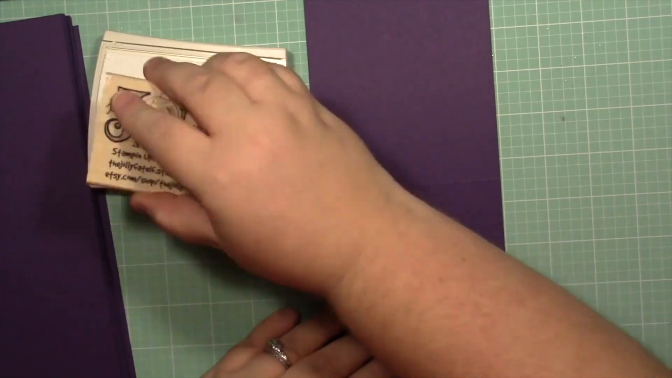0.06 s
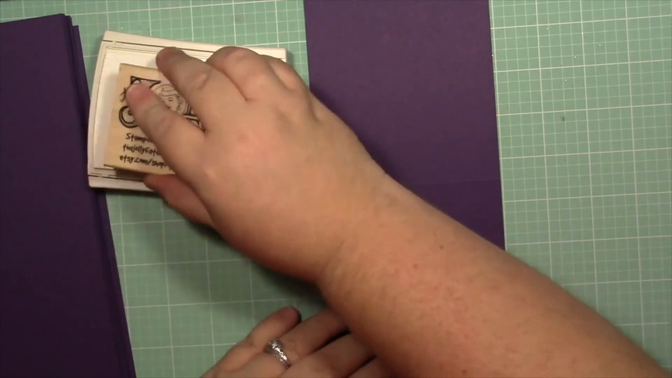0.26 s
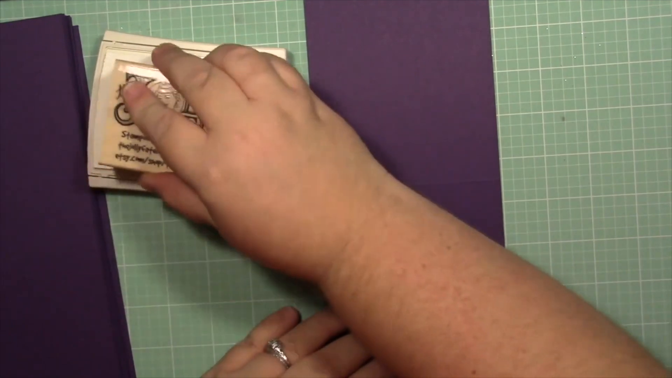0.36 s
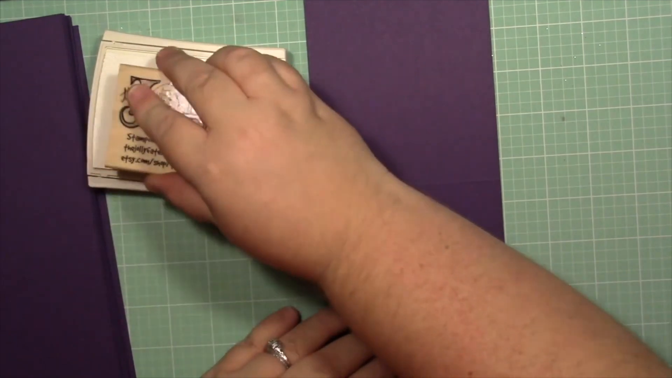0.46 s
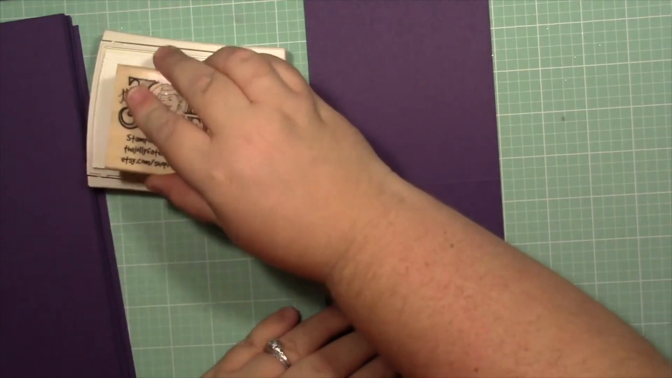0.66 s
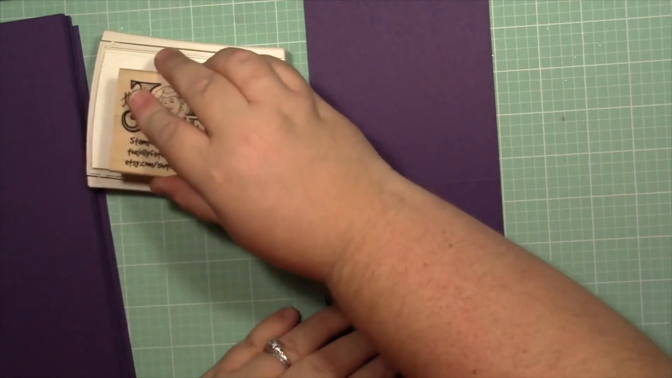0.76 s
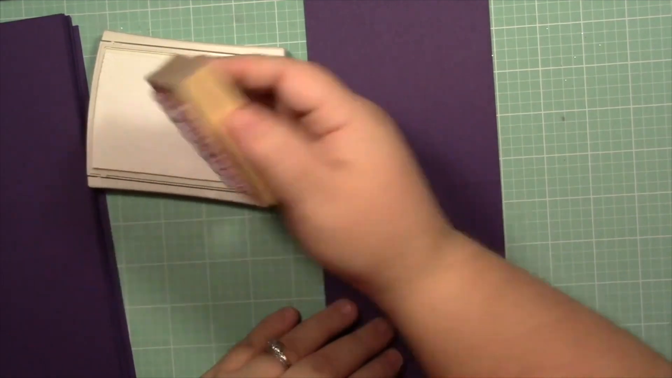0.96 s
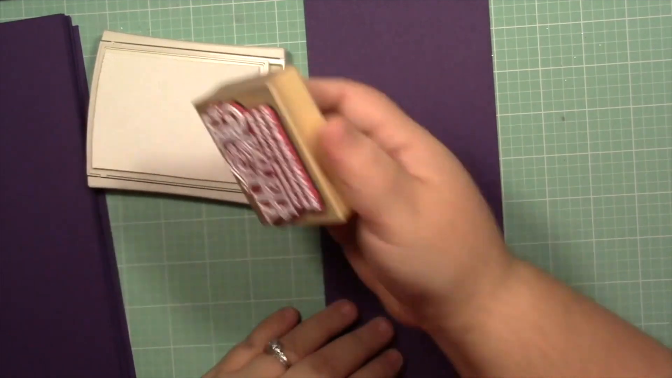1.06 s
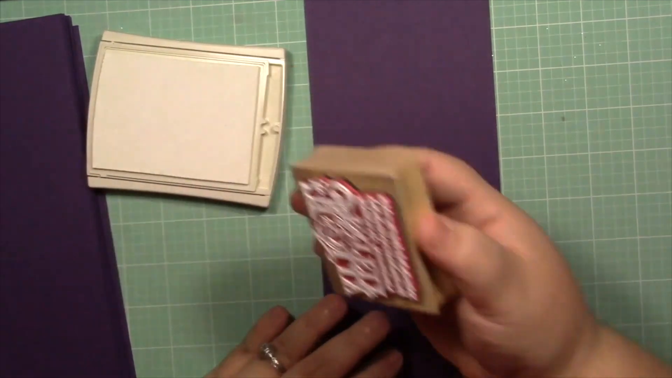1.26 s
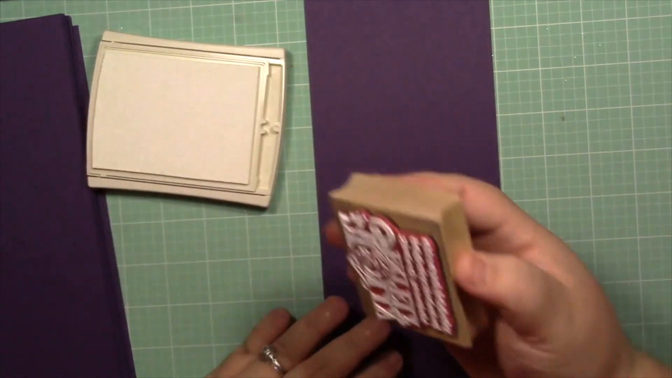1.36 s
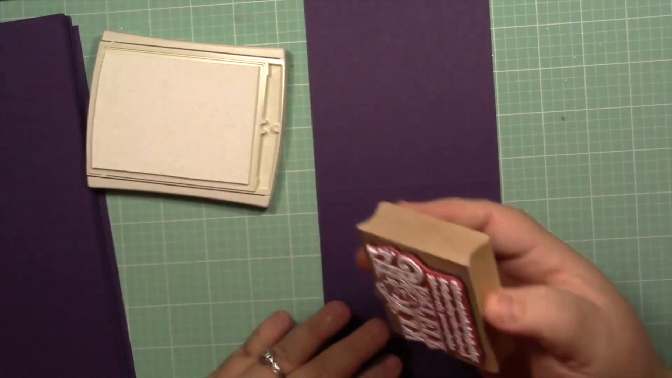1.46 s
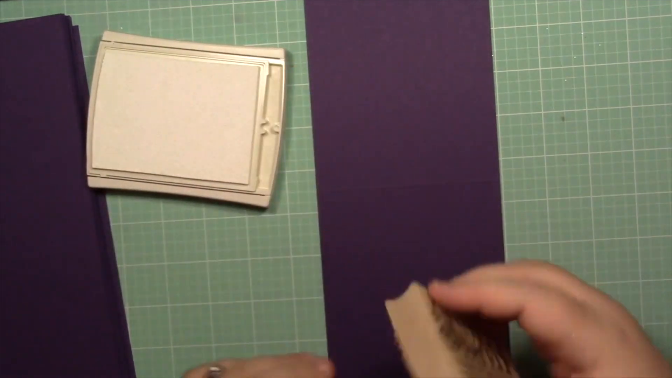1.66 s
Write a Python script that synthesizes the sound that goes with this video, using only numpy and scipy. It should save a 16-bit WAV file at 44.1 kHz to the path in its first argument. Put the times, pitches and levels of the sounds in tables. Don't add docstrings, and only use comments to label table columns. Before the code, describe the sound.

Wooden stamp knocks four times on a hollow plastic ink pad, the second knock by far loudest

```python
import sys
import numpy as np
from scipy import signal
from scipy.fft import rfft, irfft
from scipy.io import wavfile
from scipy.ndimage import uniform_filter1d, map_coordinates

SR = 44100
rng = np.random.default_rng(int(sys.argv[2]) if len(sys.argv) > 2 else 0)


def makeup_ratio(level_db):
    decades = np.asarray(level_db, float) / 20
    return 10 ** decades


def bounce(signal):
    frames = np.transpose(np.atleast_2d(signal))
    limited = np.clip(frames, -1, 1)
    pcm = np.round(limited * 32767).astype(np.int16)
    wavfile.write(sys.argv[1], SR, pcm)


N = 74970

# frequency in Hz, strength in dB per Hz.
HISS = [(25, -10), (60, -11.5), (134, -0.5), (330, -2.5), (520, -7), (1700, -14), (11000, -31),
        (16000, -45.5)]
# frequency in Hz, strength in dB per Hz.
RUSTLE = [(150, -21), (400, 0.5), (1200, -6.5), (3000, -7), (7000, -16), (15000, -25.5)]
# time in seconds, level in dB.
ARM_MOVEMENT = [(.85, -68.5), (1.0, -61.5), (1.1, -58), (1.249, -58), (1.4, -59), (1.55, -57), (1.7, -56.5)]
HISS_DB, FLOOR_SIDE_DB, ARM_PAN_DB = -58.5, 10, -0.6

# frequency in Hz, left-right difference against the middle in dB.
APART = [(30, 4), (100, -20), (600, -14), (2500, -20), (5000, -46.5), (9000, -39)]
# frequency in Hz, time to fall by 60 dB in seconds.
ROOM_FADE = [(100, 0.48), (500, 0.35), (2000, 0.43), (6000, 0.38), (14000, 0.57)]
# frequency in Hz, level in dB.
ROOM_TONE = [(60, -11), (300, 0), (600, 0), (1200, -7.5), (2000, -17.5), (3500, -15), (7000, -26),
             (15000, -49)]
ROOM_DB, ROOM_GAP_S, ROOM_RISE_S, ROOM_FOLLOWS = -5.5, 0.004, 0.002, 0.78
ROOM_RING_DB, SIDE_DB = -11, -10
WALL_S, WALL_DB = 0.0135, -18.5

TICK_S, TICK_RATE = 0.0035, 15
TICK_DB, TICK_HZ, TICK_T60, TICK_RISE_S, TICK_SCATTER_DB = -41.5, 1970, 0.011, 0.0008, 1.2

# frequency in Hz, strength in dB per Hz.
THUD = [(150, -28), (300, -32), (440, -1), (500, 5.5), (570, -4.5), (870, -3), (1600, -8), (2300, -36)]
THUD_S, THUD_DB, THUD_GRAIN_DB = 1.29, -49, 1
THUD_RISE_S, THUD_HOLD_S, THUD_T60 = 0.004, 0.025, 0.3
SNAP_S, SNAP_DB = 1.5305, -37

# time in seconds, level in dB, length in seconds, brightest Hz.
PEELS = [
    (.328, -53, .003, 6940),
    (0.503, -60, .003, 9000),
    (0.631, -58, .003, 9500),
    (.6402, -45, .004, 6840),
    (0.7947, -43, 0.0039, 8300),
    (1.078, -64, .008, 11000),
    (1.127, -60, 0.0045, 9900),
    (1.163, -65, .002, 12000),
]
# share of the brightest Hz, strength in dB per Hz.
INK = [(.15, -49), (.5, 1), (1.02, 3.5), (1.6, -10.5), (2.5, -24)]

# time in seconds, level in dB.
DROPS = [
    (0.328, -40),
    (0.8019, -23),
]
# frequency in Hz, level in dB, time to fall by 60 dB in seconds.
RIM = [(205, -6, 0.037), (417, -1, 0.017), (713, -2.5, 0.022), (1180, -3, 0.013), (1706, 0.5, 0.017),
       (2470, -12, .012), (3710, -13, 0.013)]
# frequency in Hz, strength in dB per Hz.
RIM_CRACK = [(100, -20), (300, -7), (1200, 5), (2500, -7.5), (4500, -13), (7000, -39)]
RIM_ROOM_DB = -2

# time in seconds, level in dB, case pitch in Hz, block level in dB.
TAPS = [
    (0.233, -18.5, 592, 2.5),
    (0.4177, -6, 594, -2.5),
    (0.5647, -20, 579, -0.5),
    (0.7082, -16, 552, -3),
]
# frequency in Hz, level in dB, time to fall by 60 dB in seconds.
SPOTS = [
    [(950, -13.5, 0.065), (1180, -5, 0.012), (1656, -12.5, .013)],
    [(753, -14, 0.044), (1175, -11, 0.016), (1560, -13, 0.011)],
    [(958, -5, 0.066), (1240, -8, 0.0075), (1774, -11.5, 0.018)],
    [(150, -14, .04), (1092, -1, 0.01), (1750, -12, 0.014)],
]
# frequency in Hz, level in dB, time to fall by 60 dB in seconds.
LID = [(196, -12, 0.027), (289, -8.5, 0.019), (419, -11, 0.034)]
# frequency in Hz, level in dB, time to fall by 60 dB in seconds.
BLOCK = [(2510, -13.5, 0.02), (2802, -6, 0.011), (3330, -20, 0.03), (3894, -4.5, 0.011), (4220, -12, 0.012),
         (5790, -11.5, 0.011), (6727, -14, .014), (9500, -24, 0.012)]
# frequency in Hz, level in dB, time to fall by 60 dB in seconds.
TABLE = [(88, -25.5, 0.31), (127.4, -24, 0.15), (197, -29, 0.28), (282.7, -32, 0.41), (350.4, -28.5, 0.14),
         (547, -26, 0.17)]
# frequency in Hz, strength in dB per Hz.
CRACK = [(100, -25), (300, 17), (1000, -0.5), (2000, 6.5), (4000, 8), (8000, -2.5), (12000, -5),
         (16000, -29)]
CASE_PEAK_S, CASE_LEAD_S, CASE_WIDTH_S = 0.0062, 0.0042, 0.002
LEAD_IN_S, LEAD_IN_DB = 0.004, -24.5
SPOT_RISE_S, SPOT_T60_MAX = 0.0016, 0.045
LID_DB, LID_RISE_S, LID_LEAD_S = -3.5, 0.0007, 0.00062
BLOCK_RISE_S, CRACK_DB, CRACK_T60 = 0.0005, -14.5, 0.02
TABLE_RISE_S, TABLE_FOLLOWS = 0.0056, 0.56
SCATTER_DB, PAN_DB = 1.5, -0.45

MIC_LOW_HZ, TOP_HZ = 49.4, 16300
CEILING, KNEE = 0.8, 3


def unit(x):
    return x / np.sqrt(np.mean(x ** 2) + 1e-20)


def along(points, hz):
    f, v = np.transpose(points)
    return np.interp(np.log(hz + 1), np.log(f + 1), v)


def noise(spectrum, size):
    z = rfft(rng.standard_normal(size))
    colour = makeup_ratio(along(spectrum, np.fft.rfftfreq(size, 1 / SR)))
    return unit(irfft(z * colour, size))


def add(track, s, x):
    part = track[..., max(round(s * SR), 0):][..., :x.shape[-1]]
    part += x[..., :part.shape[-1]]


def ring(modes, rise_s, scatter_db, turn):
    t = np.arange(SR // 2) / SR
    luck = rng.standard_normal((len(modes), 2))
    total = np.zeros(len(t))
    for (hz, db, t60), (level_luck, phase_luck) in zip(modes, luck):
        fade = makeup_ratio(db + scatter_db * level_luck - 60 * t / t60)
        total += fade * np.sin(2 * np.pi * hz * t + turn * phase_luck)
    return (1 - np.exp(-(t / rise_s) ** 2)) * total


def sides(x):
    return irfft(rfft(x) * makeup_ratio(along(APART, np.fft.rfftfreq(len(x), 1 / SR))), len(x))


def tail(tone):
    hz, t, z = signal.stft(rng.standard_normal((2, SR // 2)), SR, nperseg=256)
    z = z * makeup_ratio(-60 * t / along(ROOM_FADE, hz)[:, None] + along(tone, hz)[:, None])
    rise = 1 - np.exp(-np.arange(SR // 2 + 94) / SR / ROOM_RISE_S)
    mid, side = signal.istft(z, SR, nperseg=256)[1] * rise
    side = makeup_ratio(SIDE_DB) * sides(side)
    return np.array([mid + side, mid - side]) / np.linalg.norm(mid)


def room(x):
    answer = makeup_ratio(ROOM_RING_DB) * tail([(1000, 0)])
    answer[:, round(WALL_S * SR)] += makeup_ratio(WALL_DB)
    return signal.fftconvolve(x[None], answer, axes=1)


def floor():
    s, db = np.transpose(ARM_MOVEMENT)
    flutter = map_coordinates(rng.standard_normal(60), [np.arange(N) * 30 / SR])
    arm = makeup_ratio(np.interp(np.arange(N) / SR, s, db) + 1.1 * flutter)
    hiss = makeup_ratio(HISS_DB) * noise(HISS, N)
    rustle = arm * noise(RUSTLE, N)
    other = makeup_ratio(HISS_DB) * noise(HISS, N) + arm * noise(RUSTLE, N)
    side = makeup_ratio(FLOOR_SIDE_DB) * sides(other)
    return hiss + rustle * makeup_ratio([[ARM_PAN_DB], [-ARM_PAN_DB]]) + side * [[1], [-1]]


def lens_ticks():
    out = np.zeros(N)
    modes = [(TICK_HZ, 0, TICK_T60), (1.12 * TICK_HZ, -8, TICK_T60)]
    for k in range(26):
        tick = makeup_ratio(TICK_DB) * ring(modes, TICK_RISE_S, TICK_SCATTER_DB, 0.77)
        add(out, TICK_S + k / TICK_RATE, tick)
    return out


def far_thud():
    out, t = np.zeros(N), np.arange(SR // 2) / SR
    grain = THUD_GRAIN_DB * unit(uniform_filter1d(rng.standard_normal(len(t)), size=200))
    fade_db = -60 * np.maximum(t - THUD_HOLD_S, 0) / THUD_T60
    shape = makeup_ratio(THUD_DB + grain + fade_db) * (1 - np.exp(-t / THUD_RISE_S))
    add(out, THUD_S, shape * noise(THUD, len(t)))
    snap = ring([(1490, 4.5, 0.0027), (2550, -6, 0.0037)], 0.00018, 0, 0)
    add(out, SNAP_S, makeup_ratio(SNAP_DB) * snap)
    return out


def peels():
    out, t = np.zeros((2, N)), np.arange(-1024, 1024) / SR
    for s, db, length, hz in PEELS:
        grit = makeup_ratio(4.8 * uniform_filter1d(rng.standard_normal(len(t)), size=9))
        shape = np.exp(-(t / np.where(t < 0, 0.4 * length, length)) ** 2)
        colour = [(share * hz, g) for share, g in INK]
        burst = makeup_ratio(db) * noise(colour, len(t)) * grit * shape
        add(out, s + t[0], burst[None])
        add(out, s + t[0], 0.61 * room(burst))
    return out


def drops():
    out, t = np.zeros((2, N)), np.arange(SR // 2) / SR
    for s, db in DROPS:
        landing = 0.38 * makeup_ratio(-60 * t / 0.015) * noise(RIM_CRACK, len(t))
        clack = makeup_ratio(db) * (ring(RIM, 0.0006, 0.96, 1.22) + landing)
        add(out, s, clack + makeup_ratio(RIM_ROOM_DB) * room(clack[:SR // 8])[:, :len(clack)])
        add(out, s + ROOM_GAP_S, makeup_ratio(db + 9.5) * tail(ROOM_TONE))
    return out


def taps():
    out, t = np.zeros((2, N)), np.arange(SR // 2) / SR
    u = t - CASE_PEAK_S
    swell = np.exp(-(u / CASE_WIDTH_S) ** 2) + makeup_ratio(LEAD_IN_DB) * np.exp(-(u / LEAD_IN_S) ** 2)
    rise = np.exp(-(np.minimum(u, 0) / SPOT_RISE_S) ** 2)
    for (s, db, hz, block_db), spot in zip(TAPS, SPOTS):
        knock = swell * np.cos(2 * np.pi * hz * u)
        for f, g, t60 in spot:
            fade = makeup_ratio(g - 60 * np.maximum(u, 0) / min(t60, SPOT_T60_MAX))
            knock += rise * fade * np.cos(2 * np.pi * f * u)
        lid = makeup_ratio(LID_DB) * ring(LID, LID_RISE_S, SCATTER_DB, 2.56)
        add(knock, CASE_LEAD_S - LID_LEAD_S, lid)

        crack = makeup_ratio(CRACK_DB - 60 * t / CRACK_T60) * noise(CRACK, len(t))
        block = makeup_ratio(block_db) * (crack - ring(BLOCK, BLOCK_RISE_S, SCATTER_DB, 0.51))
        boom = makeup_ratio(TABLE_FOLLOWS * db - 2) * ring(TABLE, TABLE_RISE_S, SCATTER_DB, 1.81)

        add(out, s - CASE_LEAD_S, makeup_ratio(db) * (knock + room(knock[:SR // 8])[:, :len(t)]))
        add(out, s, boom + makeup_ratio(db) * block * makeup_ratio([[PAN_DB], [-PAN_DB]]))
        add(out, s + ROOM_GAP_S, makeup_ratio(ROOM_FOLLOWS * db + ROOM_DB + 10.5) * tail(ROOM_TONE))
    return out


def scene():
    return floor() + lens_ticks() + far_thud() + peels() + drops() + taps()


def band_limit(x):
    return signal.sosfilt(signal.butter(12, 16590, fs=SR, output="sos"), x)


def record(dry):
    hz = np.fft.rfftfreq(N, 1 / SR)
    bass_cut = (1j * hz / (MIC_LOW_HZ + 1j * hz)) ** 3
    x = irfft(rfft(dry) * bass_cut, N)
    x = x / (1 + np.abs(x / CEILING) ** KNEE) ** (1 / KNEE)
    mix = irfft(rfft(x) * (hz < TOP_HZ), N)
    return band_limit(mix)


dry = scene()
out = record(dry)
bounce(out)
```